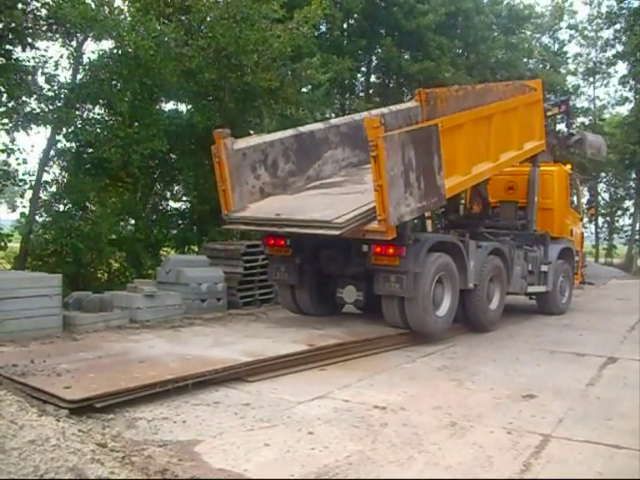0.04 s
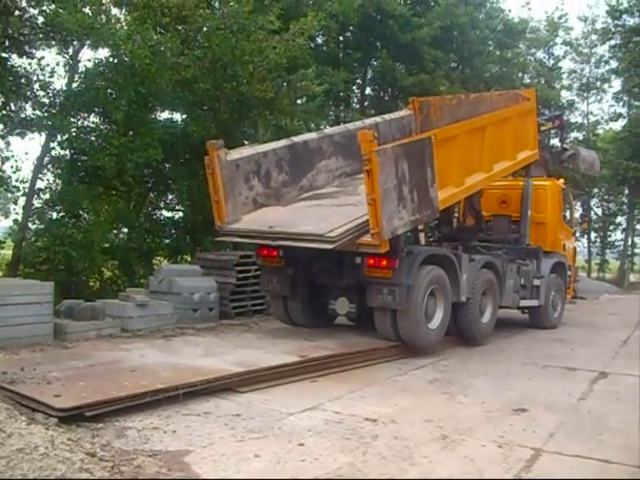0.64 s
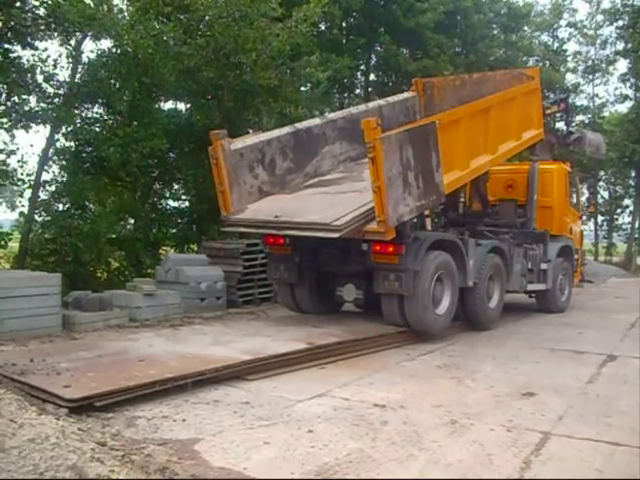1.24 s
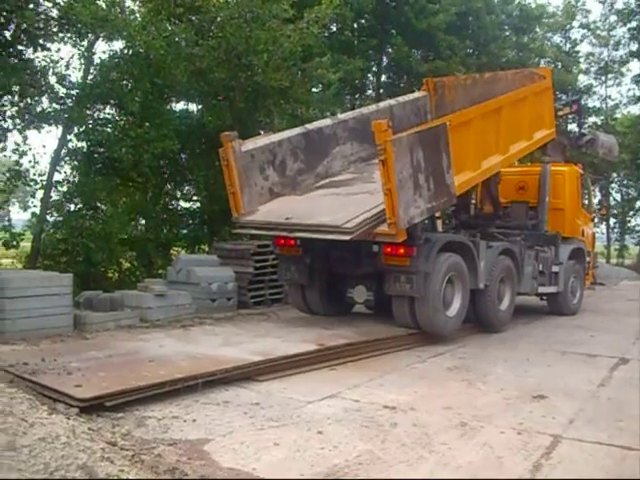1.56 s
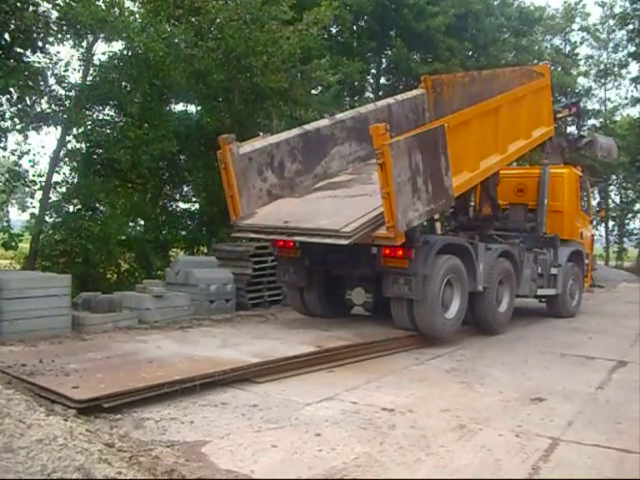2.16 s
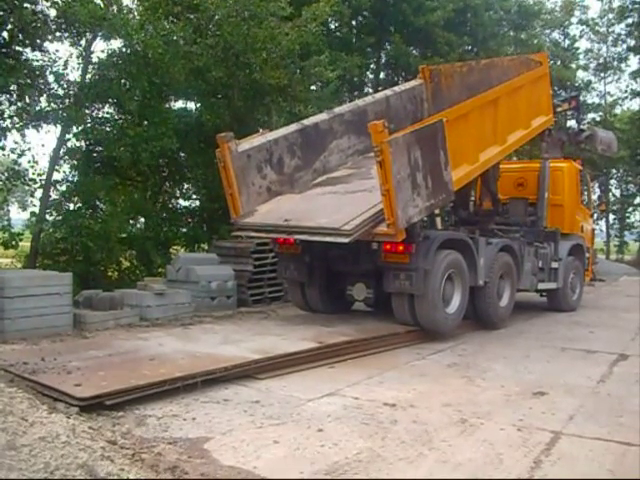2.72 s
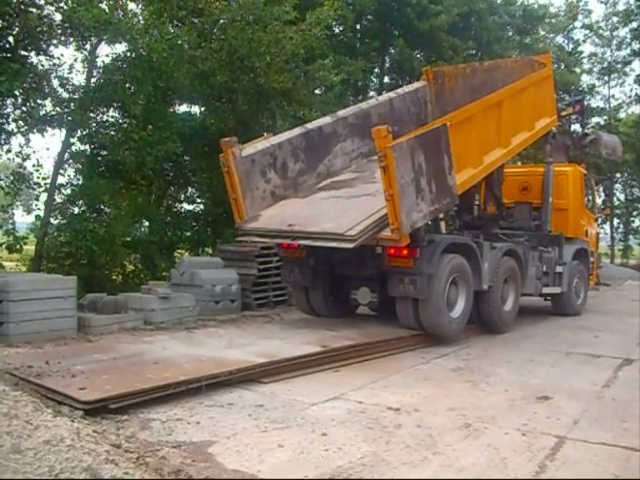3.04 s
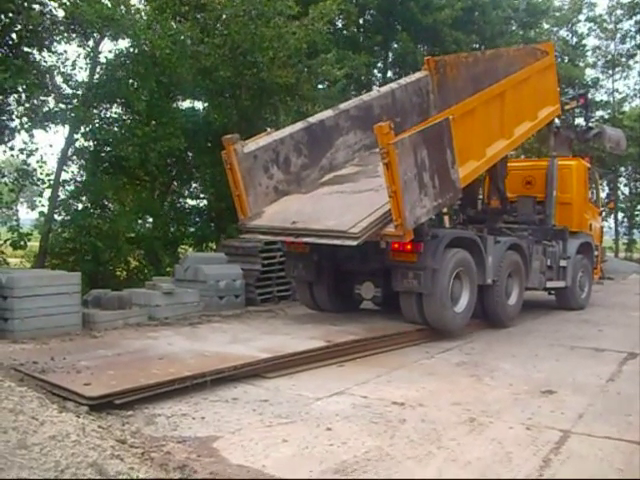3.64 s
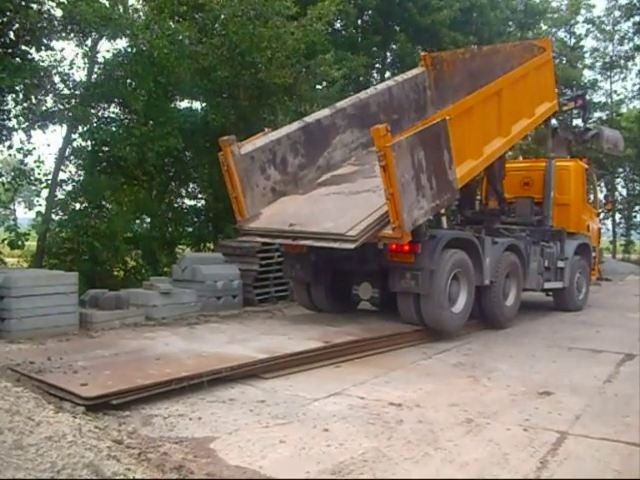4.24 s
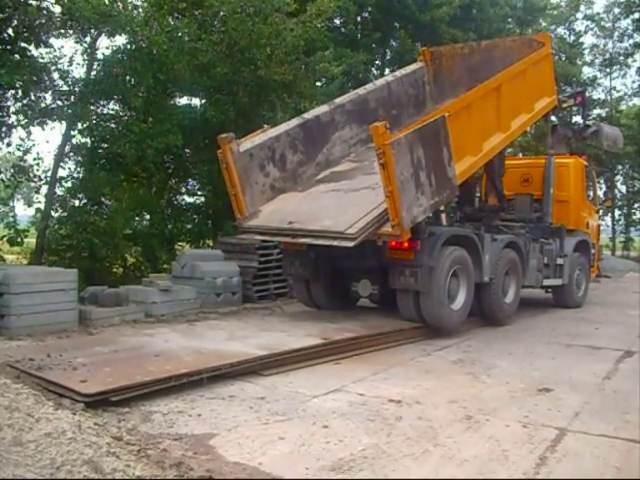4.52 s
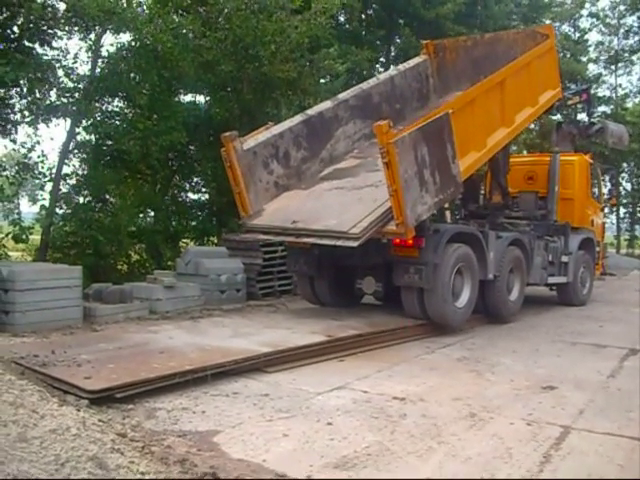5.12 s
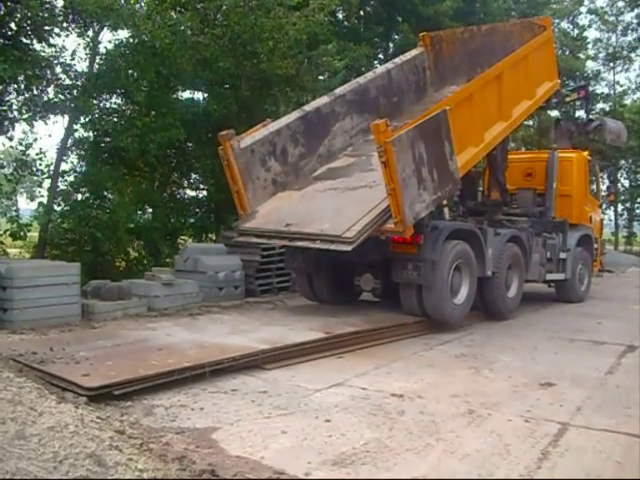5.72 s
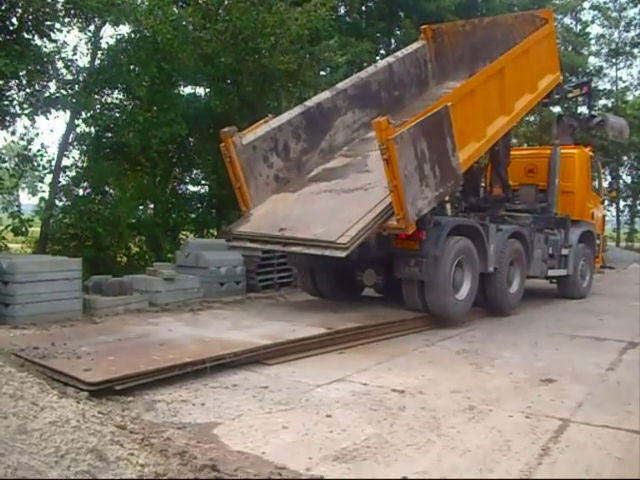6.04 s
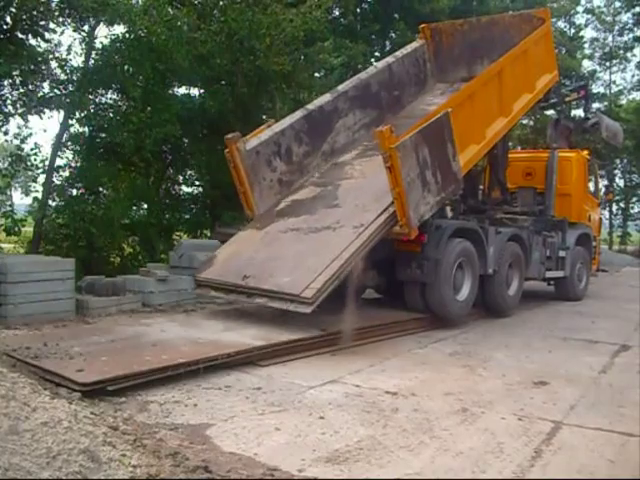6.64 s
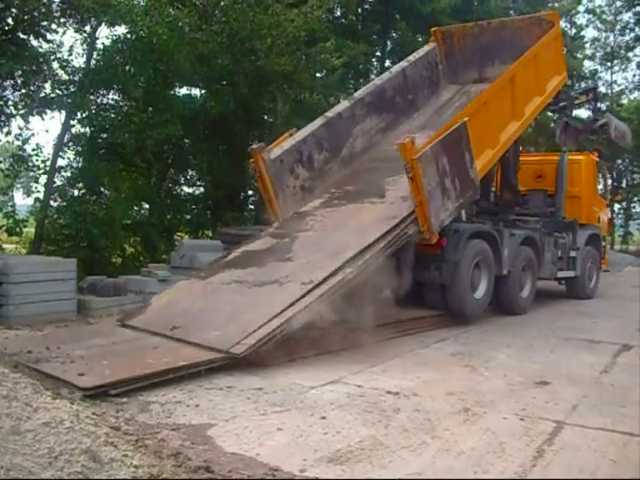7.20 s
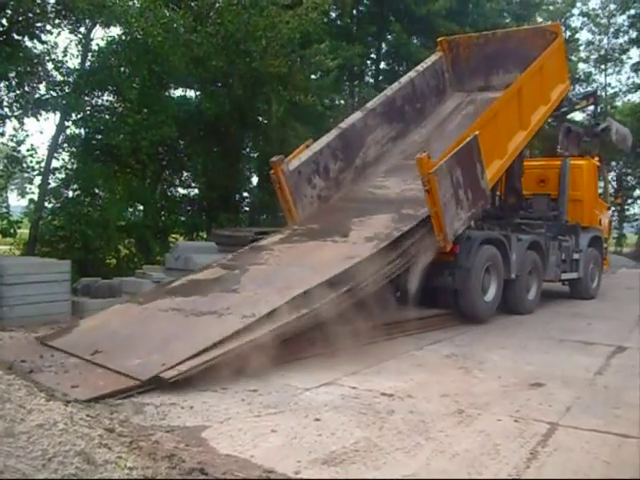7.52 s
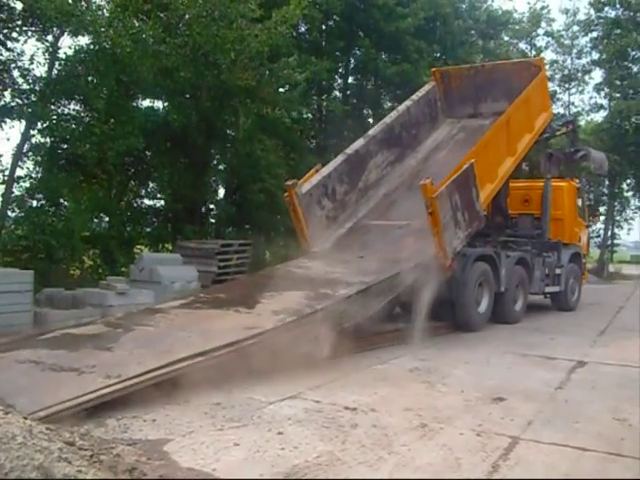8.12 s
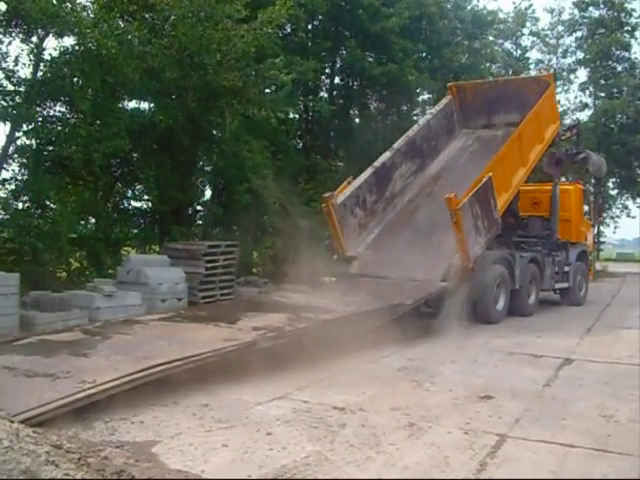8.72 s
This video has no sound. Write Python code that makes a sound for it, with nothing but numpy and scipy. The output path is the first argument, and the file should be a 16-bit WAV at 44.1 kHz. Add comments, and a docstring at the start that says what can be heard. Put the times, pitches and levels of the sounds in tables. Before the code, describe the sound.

Over a slowing diesel engine, steel plates slide off a tipper truck with a booming scrape, hissing sand and a very loud crash.

```python
"""A tipper truck raises its bed in a paved yard, and its diesel engine slows under the load of the oil pump.
At 2 s the lifting ram thuds. From about 3 s a stack of steel plates creeps in short slips; at 5 s it
scrapes down the booming bed, crushing grit, and sand starts to pour. Near 7 s it strikes the ground so
loudly that the microphone overloads. The engine picks up again while the stack skids on, flexing and
clanging, with its last knocks just before 9 s."""
import sys
import numpy as np
from scipy import signal
from scipy.fft import rfft, irfft
from scipy.io import wavfile
from scipy.ndimage import uniform_filter1d

SR = 44100
rng = np.random.default_rng(int(sys.argv[2]) if len(sys.argv) > 2 else 0)


def waveform_to_disk(signal):
    """Save audio, clipped to [-1, 1], as 16-bit WAV at the path in sys.argv[1]."""
    frames = np.transpose(np.atleast_2d(signal))
    scaled = np.clip(frames, -1, 1) * 32767
    samples = np.round(scaled).astype(np.int16)
    wavfile.write(sys.argv[1], SR, samples)


N = 390726
T = np.arange(N) / SR

# A relative_db column only compares rows of one table. A smaller width_hz means a longer ring.
# tone colour of the fan and the yard: pitch_hz, relative_db
YARD_COLOUR = [(20, -12), (55, 3.5), (140, -11), (210, -3.5), (370, -6.5), (540, -16.5), (860, -7.5),
               (1550, -26.5), (2020, -17), (2560, -31.5), (3500, -22.5), (4100, -35), (6400, -35),
               (15000, -64)]
# drift of a machine hum: time_s, pitch_hz
HUM_PITCH = [(.5, 199), (2.7, 204.6), (3.5, 199.9), (5, 205.8)]
# the engine slowing under the pump: time_s, firing_rate_hz
ENGINE_SPEED = [(0.0, 40.66), (1.0, 39.98), (1.32, 38.75), (2.09, 38.23), (2.63, 34.75), (3.38, 33.86),
                (4.45, 31.62), (4.96, 29.75), (5.61, 28.5), (6.1, 26.3)]
# upper tones of the exhaust: multiple_of_firing_rate, level_db
EXHAUST_TONES = [(1.5, -44), (3, -44), (3.5, -48), (4, -50), (6, -46), (7, -45.5), (9, -50)]
# ringing of the engine block and panels: pitch_hz, width_hz, relative_db
BLOCK_RINGS = [(673, 19, 0.5), (843, 73, 1.5), (1030, 236, -2), (1161, 160, -3), (1359, 59, -10.5),
               (1960, 140, -13.5), (2210, 135, -15.5), (2970, 860, -23), (5020, 450, -27.5),
               (6280, 370, -25.5), (10800, 3900, -35)]
# ringing of a loose metal part on the truck: pitch_hz, width_hz, relative_db
LOOSE_PART_RINGS = [(3445, 125, 4.5), (3640, 150, 0), (5020, 230, -20), (6200, 740, -22)]
# ringing of the tipping frame: pitch_hz, width_hz, relative_db
FRAME_RINGS = [(113.4, 34, -5), (202, 30, -2), (274, 27, -8), (400, 170, -15)]
# squeaks of dry steel: start_s, pitch_hz, width_hz, level_db, length_s
SQUEAKS = [(1.84, 3466, 90, -37, 0.045), (2.318, 3420, 89.6, -37, 0.034), (3.186, 3555, 90, -38.5, 0.027),
           (6.76, 5640, 900, -26, 0.087), (6.83, 5600, 1012, -24, 0.067), (7.45, 4800, 400, -24, 0.064)]
# tone colour of falling sand: pitch_hz, relative_db
SAND_COLOUR = [(5000, -0.5), (7000, 5), (8500, 0.5), (10200, 1), (12000, 0), (13200, -4), (15700, -3)]
# tone colour of crushed grit: pitch_hz, relative_db
GRIT_COLOUR = [(940, -23), (1600, -9.5), (2030, 3), (2310, -1.5), (2500, 1), (2980, 1), (3370, 3.5),
               (3950, -7), (4700, -4.5), (5670, -11), (6740, -12), (9000, -28), (11700, -24), (19800, -120)]
# short slips of the stack: start_s, strength_db, length_s
SLIPS = [(3.029, -34, .072), (3.525, -23.5, 0.041), (3.64, -32.5, 0.046), (3.807, -28, 0.054),
         (4.071, -29, .058), (4.284, -32, .062), (4.358, -26.5, 0.11), (4.464, -26.5, 0.048),
         (4.693, -27.5, 0.053), (4.79, -29.5, 0.058), (4.876, -25, 0.033), (5.052, -29.5, .054),
         (5.143, -22.5, 0.04), (5.344, -21.5, .032)]
# the long scrape down the bed and over the ground: time_s, strength_db
LONG_SCRAPE = [(4.98, -31.5), (5.07, -22.5), (5.45, -21.5), (5.65, -17.5), (5.92, -18), (6.1, -15),
               (6.6, -14), (6.92, -12), (7.1, -9), (7.46, -11.5), (7.88, -16), (8.1, -14.5), (8.25, -19.5),
               (8.58, -24.5), (8.8, -18)]
# blows of the stack: start_s, clang_db, slam_db, flex_db, decay_s
BLOWS = [(3.533, -38, -21, -28, 0.035), (5.803, -10.5, -36, -36, .025), (6.926, 3, 4, -10, .047),
         (6.986, -18, -3.5, -6.5, 0.098), (7.045, -5.5, -2, -10, 0.044), (7.155, -15, -7, -27, 0.035),
         (7.409, -7.5, -14, -8, 0.045), (7.458, -8, -7, -1, 0.029), (7.746, -15, -18, -11.5, 0.064),
         (8.101, -29, -15, -18, 0.034), (8.768, -20, -18, -27, .02), (8.825, -7.5, -10.5, -17, .08)]
# ringing of the steel plates: pitch_hz, width_hz, relative_db
PLATE_RINGS = [(648, 102, -7), (727, 63, -1), (817, 80, -2), (885, 39, 1), (926, 66, -1), (1015, 105, -2),
               (1128, 152, -8.5), (1289, 116, -5), (1390, 480, -13)]
# booming of the hollow bed: pitch_hz, width_hz, relative_db
BED_RINGS = [(133, 29, -4.5), (185, 38.6, -2), (225.7, 17, -1.5), (258, 18.3, 1), (300.3, 39.6, 1),
             (371, 67, 0), (441.6, 59, -2), (501, 57, -7.5)]
# the stack slapping flat on the ground: pitch_hz, width_hz, relative_db
SLAM_RINGS = [(75, 42, -6), (120, 45, -1), (167.4, 30, 3), (227, 47, -1.5), (302, 53, -1), (393, 190, -6)]
# slow bending of the whole stack: pitch_hz, width_hz, relative_db
BENDING_RINGS = [(32, 27, -4), (55, 4.1, 0.5), (82.6, 21, 4.5), (129, 7.9, -3), (139, 31, -5.5)]

IDLE_HZ, UNLOAD_S, RECOVER_S = 39.5, 6.9, 1.1  # the engine returns to idle as the load leaves
CREEPS_S, STICKS_S, RUNS_S = 2.76, 4.88, 4.97  # the stack creeps, sticks, then breaks loose for good
OVERHANGS_S, LANDS_S, SETTLES_S = 5.33, 6.935, 8.34  # it passes the edge, touches down, then lies flat
POUR_S, GUSH_S, POUR_ENDS_S = 5.8, 7.13, 7.32  # sand pours, then gushes as the stack sweeps the bed clean


def gain(db):
    """Turn decibels into a number to multiply by."""
    return 10 ** (np.asarray(db) / 20)


def curve(table):
    """Join (time_s, value) points with straight lines."""
    return np.interp(T, *np.transpose(table))


def unit(x):
    """Scale a signal to an average size (rms) of 1."""
    return x / np.sqrt(np.mean(x ** 2))


def noise():
    """White noise: an even hiss."""
    return rng.standard_normal(N)


def wander(rate_hz):
    """A random drift around 0 that takes rate_hz new turns a second."""
    step = int(SR / rate_hz)
    heights = np.repeat(rng.standard_normal(N // step + 2), step)
    return unit(uniform_filter1d(heights, step)[:N])


def waver(depth_db, rate_hz):
    """A volume that wanders around 1."""
    return unit(gain(depth_db * wander(rate_hz)))


def fade_in(start_s, rise_s):
    """Climb from 0 to 1, then stay there."""
    return np.clip((T - start_s) / rise_s, 0, 1)


def die_away(end_s, decay_s):
    """Stay at 1 until end_s, then fade."""
    return np.exp(-np.maximum(T - end_s, 0) / decay_s)


def swell(start_s, length_s):
    """The shape of one slip: it breaks loose quickly, then grinds to a stop."""
    age = np.maximum(T - start_s + .004, 0) / (length_s * .3)
    return age * np.exp(1 - age)


def clicks(per_s, spread_db):
    """Rough spots catch and let go, making random clicks of uneven size."""
    ticks = (rng.random(N) < per_s / SR) * rng.choice([-1, 1], N)
    return unit(ticks * gain(spread_db * np.clip(noise(), -2, 2)))


def ring(push, tap):
    """Shake an object with push; tap is its sound after one tap, scaled here to an energy of 1."""
    return signal.fftconvolve(push, tap / np.linalg.norm(tap))[:N]


def colour(table, size=2048):
    """A short tap sound with the tone colour given in a table."""
    hz, db = np.transpose(table)
    grid_hz = np.maximum(np.fft.rfftfreq(size, 1 / SR), 1)
    spectrum = gain(np.interp(np.log(grid_hz), np.log(hz), db))
    cepstrum = irfft(np.log(spectrum))
    cepstrum[1:size // 2] *= 2  # folding this in half packs the sound at the start of the tap
    cepstrum[size // 2 + 1:] = 0
    return irfft(np.exp(rfft(cepstrum)))


def modes(table, size=16384):
    """The tap sound of a ringing object: fading tones, with neighbours swinging opposite ways."""
    t = T[:size]
    return sum((-1) ** k * gain(db) * width * np.exp(-np.pi * width * t) * np.cos(2 * np.pi * hz * t)
               for k, (hz, width, db) in enumerate(table))


def band(tap, low_hz, high_hz):
    """Steel gives off little sound below low_hz; a blunt contact makes little above high_hz."""
    return signal.sosfilt(signal.butter(3, [low_hz, high_hz], "band", fs=SR, output="sos"), tap)


def echoes(x, length_s, echo_db):
    """Sound bounces between bed, paving and trees; the paths shift as the bed and plates move."""
    fade = gain(-60 * T / length_s) * fade_in(.006, .008)
    shift = 2 * np.pi * 0.6935 * T
    echo = np.cos(shift) * ring(x, noise() * fade) + np.sin(shift) * ring(x, noise() * fade)
    return (x + gain(echo_db) * echo) / np.hypot(1, gain(echo_db))


def yard_rush():
    """The steady rush of the fan and the yard."""
    return gain(-34.5) * ring(noise() * waver(0.69, 16), colour(YARD_COLOUR))


def machine_hum():
    """A quiet hum that holds its pitch better than the engine does."""
    return gain(-38) * waver(0.68, 20) * np.sin(2 * np.pi * np.cumsum(curve(HUM_PITCH)) / SR)


def oil_pump(phase):
    """Geared to the engine, the pump whines louder with oil pressure and fades once the ram changes stage."""
    pressure = gain(-39 + 2.0 * T) * die_away(2.13, 0.29)
    return pressure * waver(0.79, 12.1) * np.sin(4.58 * phase)


def exhaust(firing_hz, phase):
    """Puffs of gas make low tones; the octave drones as it passes the pitch at which the pipe rings."""
    pipe_hz, width_hz = 59, 4.5
    drone = gain(-25) / np.hypot(1, 2 * (2 * firing_hz - pipe_hz) / width_hz)
    tones = gain(-33 - 1.7 * (IDLE_HZ - firing_hz)) * np.sin(phase)  # weaker as the engine slows
    tones += np.hypot(drone, gain(-42.5)) * np.sin(2 * phase)
    for multiple, db in EXHAUST_TONES:
        tones += gain(db) * waver(3.8, 5.9) * np.sin(multiple * phase + 2 * np.pi * rng.random())
    return tones


def engine_knock(firing_hz, firings):
    """Six uneven cylinders fire in turn; each knocks the block and rattles a loose part."""
    cylinder_db = np.array([5.5, 3.5, 4.9, 3.4, 3.0, 4.8])
    stroke = firings.astype(int)
    force = gain(cylinder_db[stroke % len(cylinder_db)] + 1.1 * noise()[stroke])
    burst = force * (np.exp(-(firings % 1) / 0.25) + 0.58)
    knock = ring(unit(burst * noise()), band(modes(BLOCK_RINGS), 595, 16500))
    rattle = ring(unit(burst * noise()) * waver(3.2, 40), band(modes(LOOSE_PART_RINGS), 2960, 7700))
    level_db = -36.5 - 0.18 * (IDLE_HZ - firing_hz)  # weaker as the engine slows
    return gain(level_db) * (knock + gain(-12) * rattle)


def truck():
    """The diesel slows under load, then recovers. Returns the truck's tones and its knocking."""
    firing_hz = curve(ENGINE_SPEED)
    firing_hz += (IDLE_HZ - firing_hz) * fade_in(UNLOAD_S, RECOVER_S)
    firings = np.cumsum(firing_hz * (1 + 0.00492 * wander(12))) / SR  # a running count
    phase = 2 * np.pi * firings
    tones = exhaust(firing_hz, phase) + oil_pump(phase) + machine_hum()
    return np.sqrt(2) * tones, engine_knock(firing_hz, firings)


def ram_thud():
    """The lifting ram thuds against the frame as its next stage takes the load."""
    push = swell(start_s=2.062, length_s=0.063) * noise()
    return gain(-20.5) * ring(push, band(modes(FRAME_RINGS), 64, 450))


def squeaks():
    """Dry steel rubs briefly and rings at one pitch each time."""
    return sum(gain(db) * ring(swell(start, length) * noise(), modes([(hz, width, 0)]))
               for start, hz, width, db, length in SQUEAKS)


def falling_sand(grit):
    """Grains hiss off the bed: a pour with a last gush, a thin stream, and sand shed by crushed grit."""
    flowing = fade_in(POUR_S, 0.32)
    gush = gain(-25) * fade_in(GUSH_S, .12)
    pour = np.hypot(gain(-29) * flowing, gush) * die_away(POUR_ENDS_S, 0.023)
    stream = gain(-40.5) * flowing * die_away(SETTLES_S, 0.27)
    shed = gain(-10.5) * grit
    flow = np.sqrt(pour ** 2 + stream ** 2 + shed ** 2)
    return ring(flow * clicks(14000, 2.5), colour(SAND_COLOUR))


def friction():
    """How hard the sliding stack scrapes, booms the bed, crushes grit and bends at each moment."""
    slips = np.sqrt(sum((gain(db) * swell(start, length)) ** 2 for start, db, length in SLIPS))
    creep = gain(-48 + 6.5 * (T - CREEPS_S)) * fade_in(CREEPS_S, 0.083) * die_away(STICKS_S, 0.022)
    run = gain(curve(LONG_SCRAPE)) * fade_in(RUNS_S, 0.032)
    scrape = np.sqrt(creep ** 2 + run ** 2 + slips ** 2)
    overhang = fade_in(OVERHANGS_S, 1.75)
    landed = fade_in(LANDS_S, .02)
    skidding = landed * die_away(SETTLES_S, 0.2)
    on_bed = gain(2 - 6.5 * overhang)  # the bed booms less as the stack slides out over its edge
    rumble = scrape * np.hypot(on_bed, gain(-4.5) * skidding)
    boom = np.hypot(rumble, gain(3) * slips)  # a sudden slip jolts the bed
    grit = scrape * gain(-8.5 + 2.5 * overhang - 4 * landed)
    sway = gain(-19) * skidding + gain(-16.5) * boom
    return scrape, boom, grit, sway


def blows():
    """How hard the sudden blows strike, slam and flex the stack at each moment."""
    strike, slam, flex = np.zeros((3, N))
    for start_s, clang_db, slam_db, flex_db, decay_s in BLOWS:
        blow = fade_in(start_s, 0.00072) * die_away(start_s, decay_s)
        strike = np.hypot(strike, gain(clang_db) * blow)
        slam = np.hypot(slam, gain(slam_db) * blow)
        flex = np.hypot(flex, gain(flex_db) * blow)
    return strike, slam, flex


def steel_stack():
    """Catching, slipping and striking ring the plates and the bed, crush grit and bend the stack."""
    scrape, boom, grit, sway = friction()
    strike, slam, flex = blows()
    judder = wander(45)  # one unsteady shake shared by plates, bed and grit
    plate_push = np.hypot(scrape, strike) * unit(clicks(1800, 2.2) * gain(0.73 * judder))
    clang = ring(plate_push, band(modes(PLATE_RINGS), 450, 1450))
    bed_push = boom * unit(clicks(900, 2.3) * gain(0.97 * judder))
    bed = ring(bed_push, band(modes(BED_RINGS), 110, 527))
    ground = ring(slam * clicks(1500, 1.7), band(modes(SLAM_RINGS), 50, 530))
    crack_push = strike ** 1.2 * clicks(3000, 7.1)  # harder blows sound brighter
    crack = ring(crack_push, band(colour(GRIT_COLOUR), 1200, 3530))
    crunch = ring(grit * unit(clicks(9000, 1.8) * gain(.5 * judder)), colour(GRIT_COLOUR))
    bending = ring(np.hypot(sway, flex) * clicks(400, 3.1), band(modes(BENDING_RINGS), 30, 195))
    return gain(1.5) * clang + bed + ground + gain(-13.5) * crack + crunch + bending + falling_sand(grit)


def scene():
    """The truck and the steel over the rush of the yard, in one channel."""
    tones, knock = truck()
    rush = yard_rush()
    steel = steel_stack() + squeaks() + ram_thud()
    knock = echoes(knock, length_s=0.27, echo_db=-7)
    steel = echoes(steel, length_s=0.65, echo_db=-11)
    return (rush + tones + knock + steel)[None]


def record(dry):
    """The microphone overloads on the crash, its electronics whine thinly, and the top treble is cut."""
    whine_hz, top_hz = 15734, 15780
    whine = gain(-61) * waver(3, 25) * np.sin(2 * np.pi * whine_hz * T)
    clipped = np.clip(0.86 * dry, -1, 1)
    return signal.sosfilt(signal.ellip(10, .1, 70, top_hz, fs=SR, output="sos"), clipped + whine)


dry = scene()
out = record(dry)
waveform_to_disk(out)
```